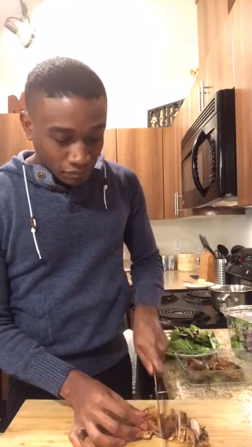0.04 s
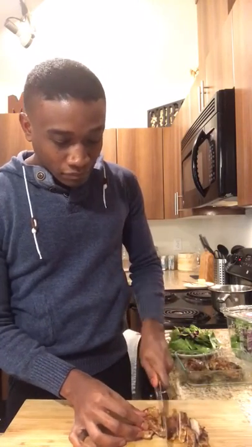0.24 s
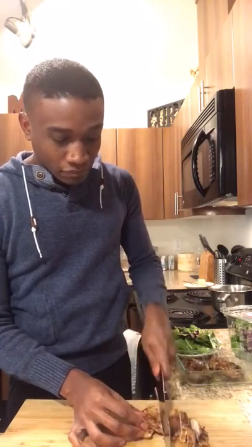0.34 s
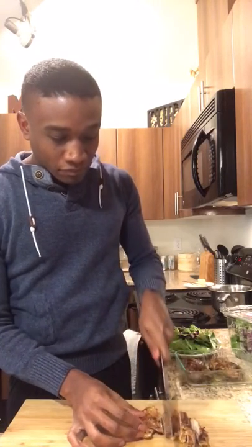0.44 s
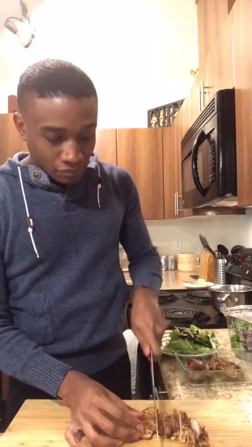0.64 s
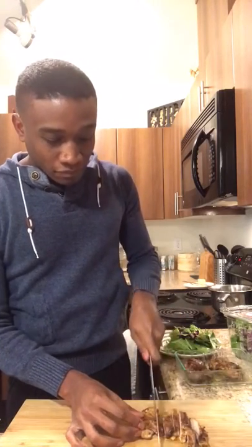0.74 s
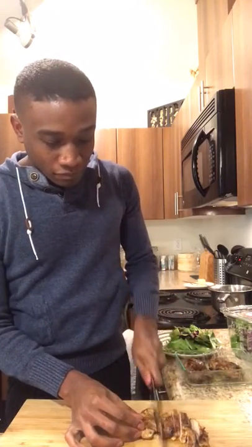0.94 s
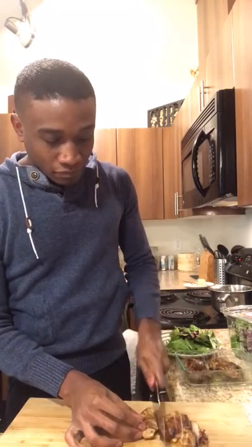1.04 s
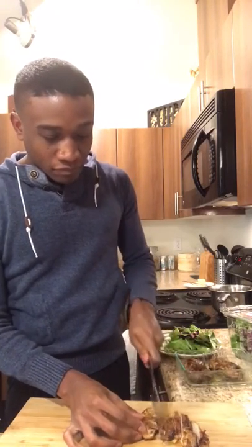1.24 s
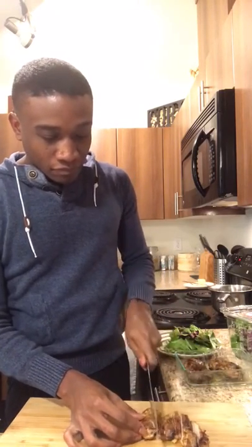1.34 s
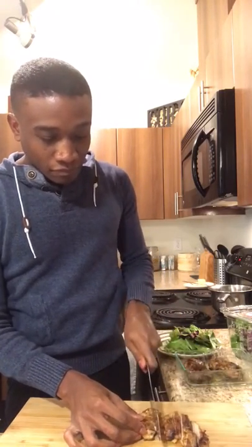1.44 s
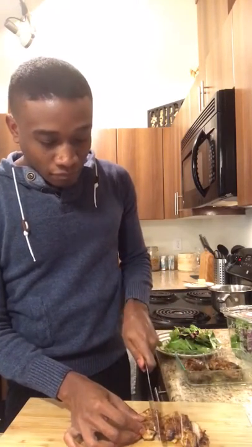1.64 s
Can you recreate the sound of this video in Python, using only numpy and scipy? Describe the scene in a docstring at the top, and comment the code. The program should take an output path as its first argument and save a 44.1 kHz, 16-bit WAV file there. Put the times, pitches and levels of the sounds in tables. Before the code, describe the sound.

Two crisp knife chops through food onto a wooden cutting board, close, with faint fridge hum

```python
"""A kitchen knife chops twice through food on a wooden board, close to a phone in a small hard kitchen.
A fridge hums (wavering tones) over the room's hiss (shaped noise) throughout. Food and blade tick and scrape
from the start (short noise bursts and swells), and the counter thuds softly (low damped swings) now and then.
At about 0.22 s and again at 0.98 s, a crush of swelling noise ends in a few quick contacts that ring the
board (dying sine waves), each with a crack of noise. The kitchen answers with reverberation."""
import sys
import numpy as np
from scipy import signal
from scipy.fft import rfft, irfft
from scipy.io import wavfile

SR = 44100
rng = np.random.default_rng(int(sys.argv[2]) if len(sys.argv) > 2 else 0)


def to_wav(s):
    """Save 16-bit WAV."""
    ch = np.atleast_2d(s).T  # columns
    pcm = np.round(np.clip(ch, -1, 1) * 32767)  # PCM
    wavfile.write(sys.argv[1], SR, pcm.astype(np.int16))


def ratio(d):
    """dB to gain"""
    e = np.asarray(d, float) / 20
    return 10 ** e


N = 74970  # length of the scene in samples


def table(hz, rows, col):
    """Value of a column at the given frequencies, joined by straight lines on a log frequency axis."""
    rows = np.array(rows)
    return np.interp(np.log(hz), np.log(rows[:, 0]), rows[:, col])


def band(x, hz, width_hz):
    """Two-pole resonance, gain 1 at the centre."""
    return signal.lfilter(*signal.iirpeak(min(hz, 0.45 * SR), hz / width_hz, SR), x)


def unit(x):
    """Scale to rms 1."""
    return x / np.sqrt(np.mean(x ** 2))


def band_noise(count, hz, width_hz):
    """Noise of rms 1, passed twice through the same resonance."""
    once = band(rng.standard_normal(count), hz, width_hz)
    return unit(band(once, hz, width_hz))


def fade(t, t60):
    """Decay by 60 dB in t60 seconds, silent before zero."""
    return (t >= 0) * ratio(-60 * np.maximum(t, 0) / t60)


def add(out, start_s, x):
    """Mix x into out from a start time in seconds."""
    i = int(round(start_s * SR))
    out[i:i + len(x)] += x[:N - i]


def room_hiss():
    """Steady noise whose spectrum is shaped by a curve."""
    # Each row: frequency in Hz, relative level in dB.
    hiss_curve = [(20, -15.5), (40, -2), (80, -6.5), (160, -13), (300, -12), (600, -18.5), (1200, -24),
                  (2500, -28.5), (5000, -31), (7000, -31.5), (10000, -37), (16000, -37)]
    level_db = -68.5
    hz = np.maximum(np.fft.rfftfreq(N, 1 / SR), 1)
    spectrum = rfft(rng.standard_normal(N)) * ratio(table(hz, hiss_curve, col=1))
    return ratio(level_db) * unit(irfft(spectrum, N))


def fridge_hum():
    """Low tones made of narrow peaks of noise, so that they waver."""
    # Each row: frequency in Hz, level in dB, width of the peak at half height in Hz.
    hum_tones = [(59.96, -63.5, 16), (119.9, -65, 12.3), (250, -78.5, 31)]
    out, hz = np.zeros(N), np.maximum(np.fft.rfftfreq(N, 1 / SR), 1)
    for tone_hz, db, width_hz in hum_tones:
        peak = 1 / (1 + ((hz - tone_hz) / width_hz * 2) ** 2)
        out += ratio(db) * unit(irfft(rfft(rng.standard_normal(N)) * peak, N))
    return out


def room(x):
    """Dense reflections: third-octave bands of noise, each dying at its own rate, then more slowly."""
    # Each row: frequency in Hz, gain of the noise in dB, time to die by 60 dB in seconds.
    reverberation = [(60, -27, .45), (125, -30, 0.33), (250, -31.5, .38), (450, -30.5, 0.37),
                     (798.5, -30.5, 0.29), (1250, -29, 0.28), (2000, -34.5, .29), (3000, -32.5, .26),
                     (4500, -40.5, .25), (7000, -31.5, 0.15), (10000, -38.5, .18), (16000, -39.5, .18)]
    gap_s, rise_s = 0.003, 0.004
    late_db, late_stretch = -13.5, 2.36  # slower sound coming back from the adjoining space
    t = np.arange(32768) / SR - gap_s
    tail = np.zeros(len(t))
    for hz in 50 * 2 ** (np.arange(26) / 3):
        t60 = table(hz, reverberation, col=2)
        decay = fade(t, t60) + ratio(late_db) * fade(t, t60 * late_stretch)
        noise = band(rng.standard_normal(len(t)), hz, hz / 4)
        tail += ratio(table(hz, reverberation, col=1)) * noise * decay
    tail *= 1 - np.exp(-np.maximum(t, 0) / rise_s)
    return signal.fftconvolve(x, tail)[:N]


def thuds():
    """Soft thuds through the counter: low damped swings with a soft start."""
    # Each row: start in seconds, level in dB before rise and decay, frequency in Hz,
    # rise time constant in seconds, time to die by 60 dB in seconds.
    counter_thuds = [(.081, -33.5, 319, 0.0075, 0.019), (0.221, -54, 130, .01, .2),
                     (0.249, -31, 64.4, 0.013, 0.19), (.28, -24, 441, 0.0084, 0.068),
                     (0.309, -49, 62, 0.017, 0.28), (1.119, -39.5, 250, 0.0041, .08),
                     (1.128, -33, 129.5, 0.0044, 0.11), (1.138, -40, 62.4, 0.01, 0.19),
                     (1.2, -44.5, 125, 0.0073, 0.11), (1.447, -46, 125, .004, .12)]
    out, t = np.zeros(N), np.arange(16384) / SR
    for start_s, db, hz, rise_s, t60 in counter_thuds:
        envelope = (1 - np.exp(-t / rise_s)) * fade(t, t60)
        add(out, start_s, ratio(db) * envelope * np.sin(2 * np.pi * hz * t))
    return out


def scrapes():
    """Soft scrapes of the blade: brief swells of noise."""
    # Each row: middle in seconds, time from the middle to half strength in seconds, level at the middle in dB,
    # centre in Hz, width of the resonance in Hz.
    blade_scrapes = [(.068, .01, -66.5, 13000, 5000), (.10, 0.065, -72.5, 3500, 3000),
                     (.375, 0.034, -77, 13000, 6100), (.905, .02, -72.5, 3850, 1800),
                     (1.03, 0.039, -73, 13000, 7850), (.93, 0.056, -67, 300, 200),
                     (1.458, .03, -67, 250, 200)]
    out, t = np.zeros(N), np.arange(N) / SR
    for middle_s, half_s, db, hz, width_hz in blade_scrapes:
        swell = np.cos(np.pi / 4 * np.clip((t - middle_s) / half_s, -2, 2)) ** 2
        out += ratio(db) * band_noise(N, hz, width_hz) * swell
    return out


def ticks():
    """Small ticks of food and blade: dying bursts of noise in one resonance each."""
    # Each row: start in seconds, level at the start in dB, centre in Hz, width of the resonance in Hz,
    # time to die by 60 dB in seconds.
    small_ticks = [(.0020, -56, 4500, 3000, .008), (.0280, -53.5, 12500, 5050, .008),
                   (.0315, -61, 6000, 4020, .008), (.0460, -60.5, 8020, 6000, .008),
                   (.0553, -44.5, 2800, 2440, .012), (.0555, -46, 6200, 2500, .01),
                   (.0555, -45, 12500, 5000, .008), (.062, -52.5, 3800, 3000, 0.014),
                   (.0640, -52, 4500, 4030, 0.007), (.078, -61, 2000, 1500, .03),
                   (.1125, -51, 3700, 1460, 0.014), (.1125, -60.5, 11000, 8020, .01),
                   (.1385, -58, 4000, 4060, .03), (.1425, -61.5, 5500, 4150, .04),
                   (.1750, -56, 3550, 900, .02), (.1895, -63.5, 14000, 5000, .01),
                   (.195, -54, 1200, 1500, 0.024), (.3745, -53.5, 5800, 5000, .015),
                   (.402, -62, 6000, 6000, .015), (.5085, -59, 13500, 6000, .01),
                   (.538, -64, 7000, 4080, 0.012), (.7830, -63.5, 6500, 3950, .01),
                   (.8175, -57, 5500, 3970, .01), (.8150, -66, 14000, 4000, .015),
                   (.888, -66.5, 4000, 2497, .04), (.9070, -59, 4200, 1500, .04),
                   (1.048, -55.5, 14000, 5000, .01), (1.168, -66, 4800, 3000, .04),
                   (1.175, -64.5, 10990, 8970, .012), (1.1902, -47.5, 3700, 2470, 0.0123),
                   (1.239, -56, 5500, 1200, 0.018), (1.239, -66, 3400, 1500, 0.023),
                   (1.447, -64.5, 6000, 7980, .012), (1.4875, -65.5, 3500, 2500, .015),
                   (1.488, -63, 6000, 2000, .015)]
    out, t = np.zeros(N), np.arange(4096) / SR
    for start_s, db, hz, width_hz, t60 in small_ticks:
        add(out, start_s, ratio(db) * band_noise(len(t), hz, width_hz) * fade(t, t60))
    return out


def crush():
    """The edge crushing through food: grainy noise that swells until the edge lands."""
    # Each row: end in seconds, time constant of the swell in seconds, level at the end in dB,
    # centre in Hz, width of the resonance in Hz.
    food_crushes = [(0.217, .012, -52, 1200, 2500), (.218, .003, -43.5, 2930, 700),
                    (.98, .012, -55.5, 1500, 3000), (0.982, .006, -48, 3000, 900)]
    out, t = np.zeros(N), np.arange(N) / SR
    for end_s, swell_s, db, hz, width_hz in food_crushes:
        swell = np.exp(np.minimum(t - end_s, 0) / swell_s) * (t < end_s)
        out += ratio(db) * band_noise(N, hz, width_hz) * swell
    return out


def knocks(share, turn):
    """Each contact pushes the board and blade modes, which ring for a share of their length, and cracks.
    turn 0 keeps the phases toward the phone, turn 1 scatters them as other directions do."""
    # Modes of board and blade. Each row: frequency in Hz, full time to die by 60 dB in seconds,
    # relative level in dB when struck at spot 0, the same at spot 1.
    modes = [(125, 0.15, -13.5, -22), (220, 0.056, -20, -27), (345, .035, -6, 2.5),
             (560, .025, -9.5, -16.5), (822, 0.03, -1, -4), (1050, 0.031, -3, 2.5), (1303, .03, -4.5, -15),
             (1674, 0.02, 3, -28.5), (1822, .035, -4, -7.5), (2300, .016, -7.5, -15), (2550, 0.02, -9.5, 0),
             (2950, 0.013, -8.5, -10), (3450, 0.0088, -5, 5), (4450, .01, -5, -13.5),
             (5600, .008, -21.5, -7.5), (6657, .01, -14.5, -8.5)]
    # Contacts of the edge with the board. Each row: start in seconds, level in dB, push length in ms
    # (the push peaks after a quarter of it), spot (its whole part counts).
    contacts = [(0.2181, -11.5, .12, 0.29), (0.2219, -18, 0.69, 0), (.2240, -19.5, 0.41, 0),
                (.2300, -24.5, .3, 0), (0.9806, -22.5, 0.081, 1), (.9820, -21, .1, 1),
                (.9843, -19, 0.38, 1)]
    crack_db, crack_t60_s, crack_hz = -44.5, 0.012, 6500  # level for a push length of 1 ms
    rise_cycles = 0.51  # bending waves spread slower at low pitch, so each mode swells over part of a cycle
    out, t = np.zeros(N), np.arange(4096) / SR
    for start_s, db, push_ms, spot in contacts:
        flips = np.pi * (np.arange(len(modes)) // 3)  # the sign flips after every three modes
        phases = 2 * np.pi * turn * rng.random(len(modes)) + flips
        ring = np.zeros(len(t))
        for mode, phase in zip(modes, phases):
            hz, t60 = mode[:2]
            envelope = fade(t, t60 * share) * (1 - np.exp(-t * hz / rise_cycles))
            ring += ratio(mode[2 + int(spot)]) * envelope * np.sin(2 * np.pi * hz * t + phase)
        push = t[:128] * np.exp(-t[:128] * 4000 / push_ms)
        pushed_ring = np.convolve(ring, push / push.sum())[:len(t)]
        # a shorter push cracks louder
        noise = band(rng.standard_normal(len(t)), crack_hz, crack_hz)
        crack = ratio(crack_db) / push_ms * noise * fade(t, crack_t60_s)
        add(out, start_s, ratio(db) * (pushed_ring + crack))
    return out


def scene():
    """Knife sounds, direct and through the room, with thuds, hum and hiss."""
    small = crush() + ticks() + scrapes()
    small_send_db = -9  # the small sounds are shielded by hand and food, and stir the room less
    knock_send_db = 2.5  # the blurred rings, summed over all directions
    # the walls get the board from all sides: its rings reach them blurred to a smaller share of their length
    scattered = knocks(share=0.22, turn=1)
    sent = ratio(knock_send_db) * scattered + ratio(small_send_db) * small
    direct = knocks(share=0.88, turn=0) + small
    return (direct + room(sent) + thuds() + room_hiss() + fridge_hum())[None]


def low_pass(x):
    """Removes everything above the highest recorded frequency."""
    return signal.sosfilt(signal.butter(12, 16500, fs=SR, output="sos"), x)


def record(dry):
    """The phone's microphone drops the deep bass: a second-order high-pass."""
    corner_hz = 75
    s = 1j * np.fft.rfftfreq(N, 1 / SR) / corner_hz
    high_pass = s ** 2 / (1 + np.sqrt(2) * s + s ** 2)
    mix = irfft(rfft(dry) * high_pass, N)
    return low_pass(mix)


dry = scene()
out = record(dry)
to_wav(out)
```